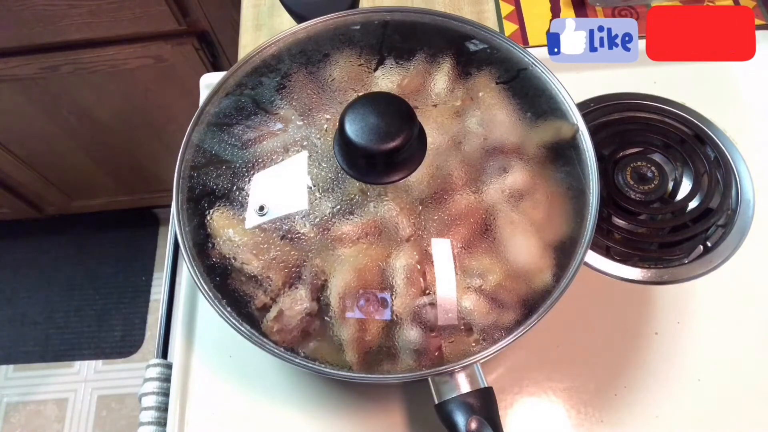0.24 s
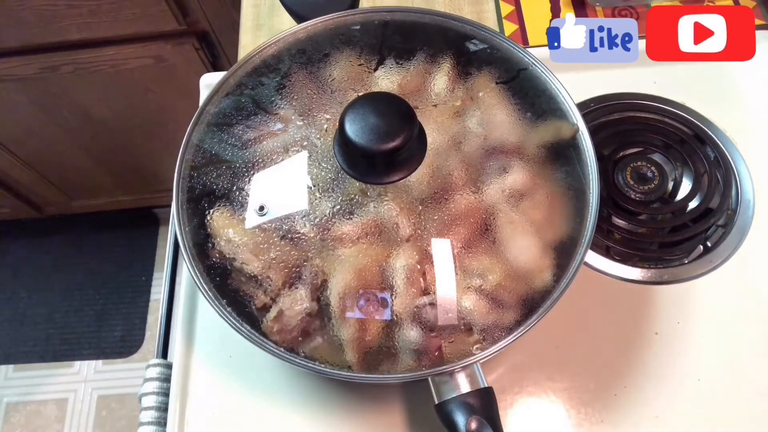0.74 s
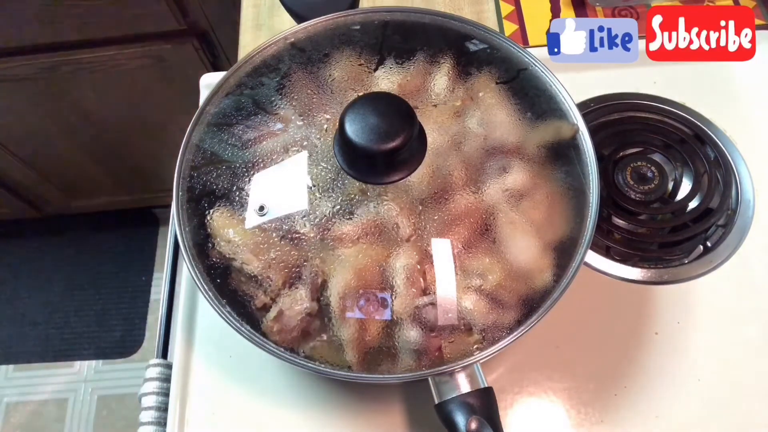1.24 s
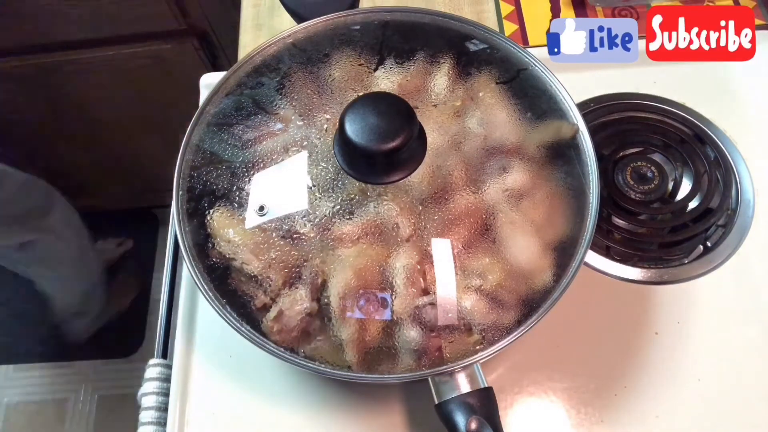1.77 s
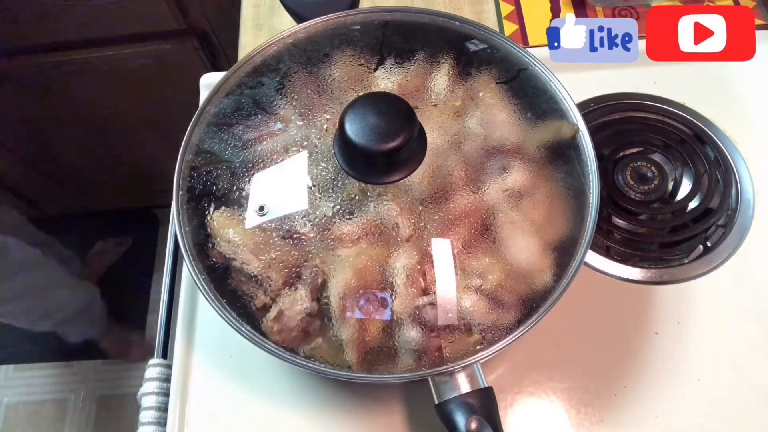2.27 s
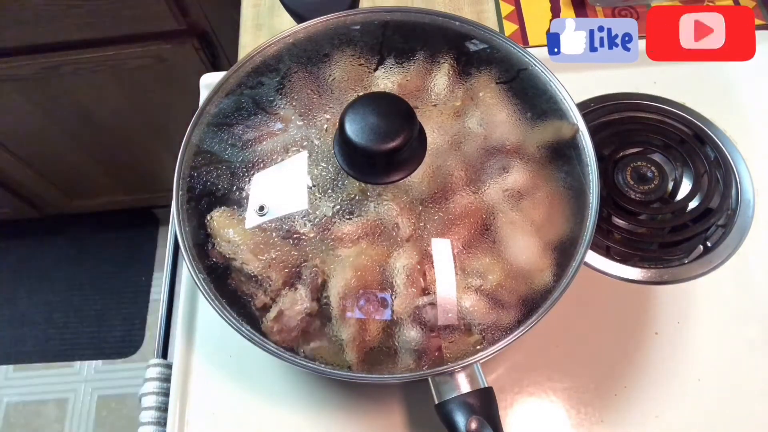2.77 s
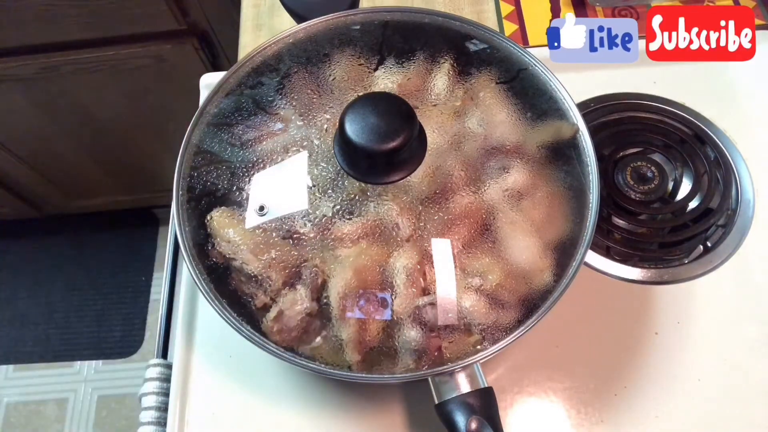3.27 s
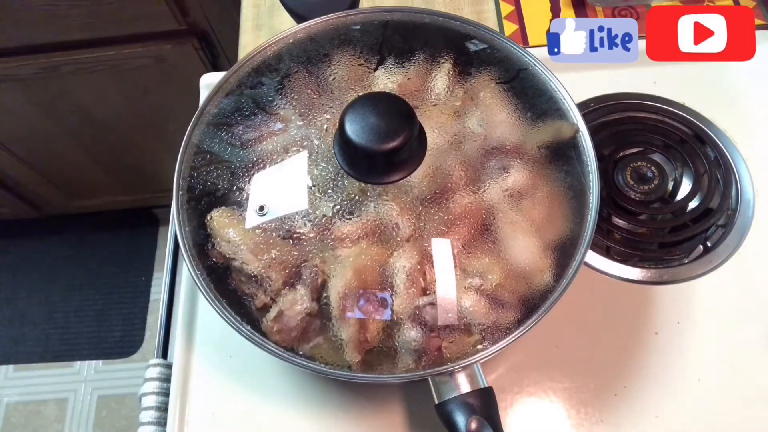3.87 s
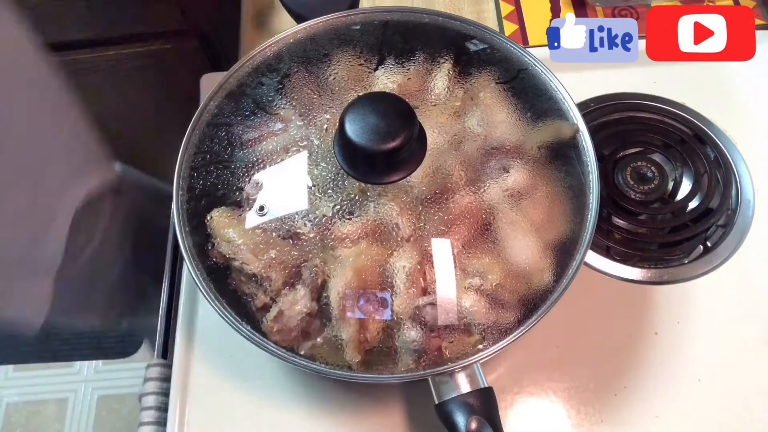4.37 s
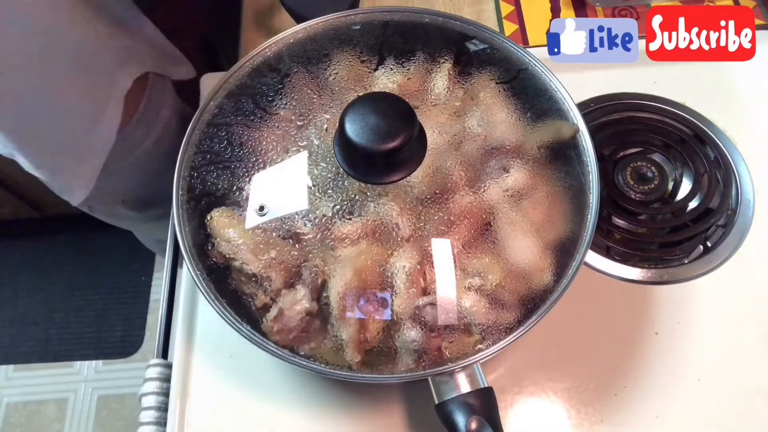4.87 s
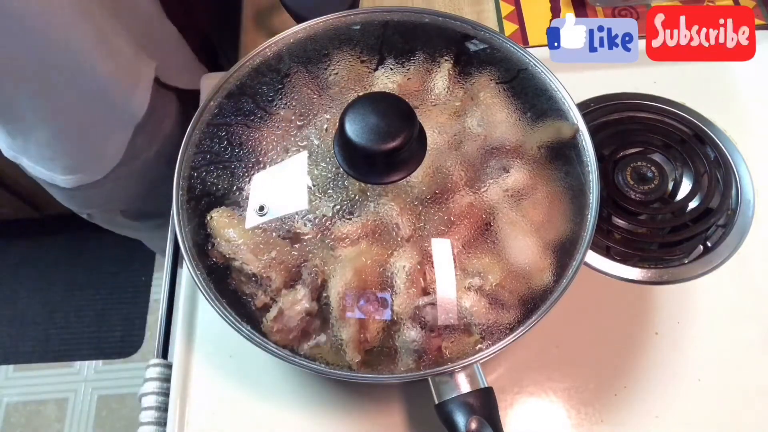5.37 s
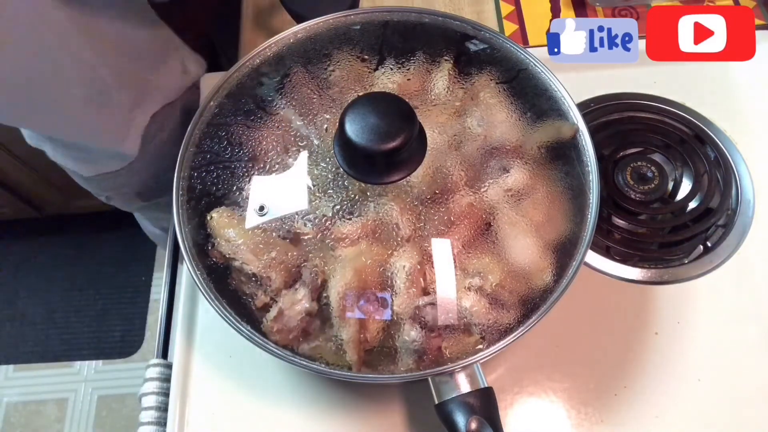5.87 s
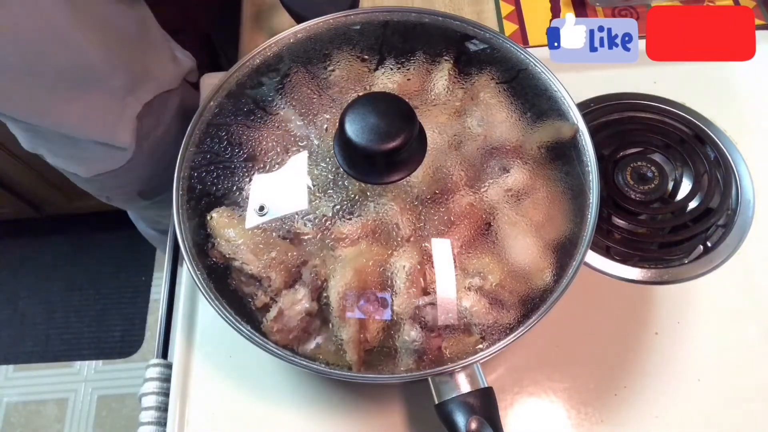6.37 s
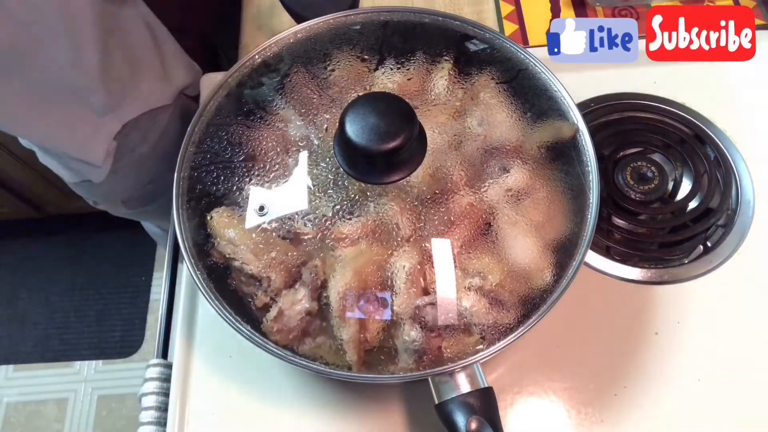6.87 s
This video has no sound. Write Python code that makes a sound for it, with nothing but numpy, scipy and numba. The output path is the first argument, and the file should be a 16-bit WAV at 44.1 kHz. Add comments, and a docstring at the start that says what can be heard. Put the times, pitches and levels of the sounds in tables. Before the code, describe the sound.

Food simmers steadily under a skillet lid with fine crackles and sharp pops, while someone nearby knocks hard objects and briefly scrapes wood.

```python
"""A kitchen: food simmers under the glass lid of a skillet, many small bubbles ringing the air below it.
Dense random clicks, coloured by pan and lid, make the simmer; bright grains and snaps make the crackle.
Someone moving about knocks things (struck resonators), slides them on wood (filtered stick-slip clicks)
and makes small metal parts tinkle. An appliance hums as one wavering low tone."""
import sys
import numpy as np
from scipy import signal
from scipy.fft import rfft, irfft
from scipy.io import wavfile
from scipy.ndimage import uniform_filter1d
from numba import njit

SR = 44100
rng = np.random.default_rng(int(sys.argv[2]) if len(sys.argv) > 2 else 0)


def put_to_file(sound):
    """Save the sound as 16-bit audio at rate SR, in the file named by the first command-line argument."""
    columns = np.atleast_2d(sound).T  # one column per channel
    safe = np.clip(columns, -1, 1)
    whole_steps = np.round(safe * 32767)
    wavfile.write(sys.argv[1], SR, whole_steps.astype(np.int16))


N = 313551  # length in samples


def undb(db):
    """Decibels to an amplitude factor."""
    return 10 ** (np.asarray(db) / 20)


def level(x, db):
    """Scales x, of rms 1 at first or not at all, by its own rms so that rms 1 comes out at 0 dB."""
    return x * undb(db) / np.sqrt(np.mean(x ** 2))


@njit
def svf(x, hz, width):
    """State-variable band-pass with a moving centre, gain 1 there; width is a share of the centre."""
    y = np.empty(len(x))
    band_state, low_state = 0., 0.
    for i in range(len(x)):
        g = np.tan(np.pi * hz[i] / SR)
        v = (band_state + g * (x[i] - low_state)) / (1 + g * (g + width))
        band_state = 2 * v - band_state
        low_state = low_state + 2 * g * v
        y[i] = width * v
    return y


def band(x, hz, width):
    """Band-pass around a fixed or moving centre; width is a share of the centre."""
    centre = np.clip(hz * np.ones(len(x)), 20, SR / 2.3)
    return svf(x, centre, width)


def ring(x, modes):
    """Damped resonators (pitch [Hz], level [dB], t60 [s]) struck by x."""
    out = 0
    for k, (hz, db, t60) in enumerate(modes):
        pole = np.exp(2j * np.pi * hz / SR - np.log(1000) / (t60 * SR))
        tone = signal.lfilter([1], [1, -pole], x).imag
        out = out + (-1) ** k * undb(db) * tone  # neighbours start with opposite sign
    return out


def walk(rate):
    """Random levels held for 1 / rate seconds and slewed twice; spread near 1."""
    k = int(SR / rate)
    steps = np.repeat(rng.standard_normal(N // k + 1), k)
    return 1.27 * uniform_filter1d(uniform_filter1d(steps, k), k)[:N]


def clicks(size, spread_db):
    """Dense one-sample bursts, mostly small and now and then large; rms 1."""
    boost_db = spread_db * np.minimum(rng.exponential(size=size), 5)
    return level(rng.standard_normal(size) * undb(boost_db), 0)


def ticks(per_s, spread_db):
    """Lone sharp ticks at random moments, rms 1."""
    when = rng.random(N) < per_s / SR
    size = rng.standard_normal(N)
    return level(when * np.sign(size) * undb(spread_db * np.abs(size)), 0)


def fade(push, t60, size):
    """Rises within 1 ms, holds for the push [s], then dies away by 60 dB per t60 [s]."""
    t = np.arange(size) / SR
    return np.minimum(t / 0.001, 1) * undb(-60 * np.maximum(t - push, 0) / t60)


def swell(t, s, length, attack, release):
    """Rises, holds and falls away within the length; 0-1."""
    return np.clip(np.minimum((t - s) / attack, (s + length - t) / release), 0, 1)


def add(out, s, x):
    """Mixes x into out from time s [s]."""
    i = int(s * SR)
    out[i:i + len(x)] += x[:len(out) - i]


def simmer():
    """Bubbles too dense to tell apart: pan and lid colour them and each band flickers a little."""
    # colour of the simmer: (frequency [Hz], relative level [dB])
    colour = [(13, -72), (22, -42), (48, -49), (111, -15.5), (168, -17), (254, -13.5), (549, -1.5),
              (784, -8), (1400, -2.5), (1560, -5), (1790, -6), (2490, -4.5), (3370, -19.5), (4200, -13),
              (15700, -38.5)]
    # resonances (+) and notches (-) of pan and lid: (centre [Hz], width [Hz], gain [dB])
    lid = [(128, 13, 9), (323.7, 9, 4.5), (674, 65, 7.5), (776, 310, -4.5), (1428, 110, 4.5),
           (1536, 270, -10), (2470, 140, 3), (2900, 360, 2), (4340, 280, -1), (7040, 83, 14)]
    simmer_db = -49.5
    hz = np.maximum(np.fft.rfftfreq(N, 1 / SR), 1)
    colour_hz, colour_db = np.array(colour).T
    db = np.interp(np.log(hz), np.log(colour_hz), colour_db)
    db = db + sum(gain_db / (1 + (2 * (hz - f) / w) ** 2) for f, w, gain_db in lid)
    bubbles = rfft(clicks(N, 3.64)) * undb(db)
    drift = walk(1.55)  # slow, common to all bands
    place = 3 * np.log2(hz / 20)  # in third-octaves above 20 Hz
    out = 0
    for k in range(0, 32, 2):
        overlap = np.maximum(1 - np.abs(place - k) / 2, 0)  # neighbouring bands crossfade
        part = irfft(bubbles * overlap, N)
        out = out + part * undb(0.091 * drift + 1.65 * walk(14))
    return level(out, simmer_db)


def crackle():
    """A fine bed sputters and surges; bursts open with a snap and thin out as spray."""
    out = fizz()
    add_bursts(out)
    return out


def fizz():
    """Fine grains in bands that sputter together and alone, surging and falling back to a faint bed."""
    # surges: (start [s], length [s], level [dB], tilt before drift [dB per octave])
    surges = [(0.52, 0.1, -51, -5), (0.61, 0.18, -49.5, -3), (0.79, 0.066, -45.5, 0), (1.53, 0.27, -47, -2),
              (1.788, 0.16, -48.5, 4), (1.938, 0.26, -43.5, 0), (2.195, 0.045, -51, 0),
              (2.255, 0.13, -46.5, -2.5), (2.399, 0.12, -46.5, -2), (2.52, 0.23, -51.5, -1),
              (2.742, 0.11, -57, -8), (2.945, .12, -54, -17), (3.122, 0.16, -52.5, -8),
              (3.388, 0.068, -35, -2), (3.582, 0.065, -47, -3), (3.7, 0.21, -52, -1),
              (3.936, 0.11, -46, -2), (4.1, 0.098, -51, -2), (4.188, 0.2, -44.5, -3.5),
              (4.385, 0.16, -54, 0), (4.546, 0.13, -48.5, -7), (4.635, .16, -48.5, -5), (4.83, .04, -52, 0),
              (4.89, 0.079, -54, -6), (5.547, .11, -51.5, -4), (6.466, 0.19, -65, -5),
              (6.64, 0.18, -57.5, -4), (6.912, 0.1, -50, -12)]
    # colour of the fizz before tilt and flicker: (centre [Hz], level [dB])
    fizz_bands = [(4500, -3), (6500, -2.5), (9000, 4), (12000, 3.5), (14800, 3.5)]
    attack_s, release_s = 0.033, 0.055
    bed_db, bed_tilt_db, tilt_drift_db = -59, -2.5, 2  # level [dB]; tilt and its drift [dB per octave]
    t = np.arange(N) / SR
    grains = clicks(N, 3.5) * undb(2.2 * walk(150))
    gains = np.array([undb(db) * swell(t, s, length, attack_s, release_s) for s, length, db, _ in surges])
    gain = undb(bed_db) + gains.sum(axis=0)
    # the loudest part of the mix sets the colour
    surge_tilts = np.array(surges)[:, -1]
    tilt = (bed_tilt_db * undb(bed_db) + surge_tilts @ gains) / gain
    tilt = tilt + tilt_drift_db * walk(10)
    bed = 0
    for hz, band_db in fizz_bands:
        flicker_db = 1.3 * walk(60)
        # every band also has ticks of its own, so the flecks differ in colour
        flecks = grains + undb(-4.5) * ticks(110, 4.0)
        own_db = band_db + tilt * np.log2(hz / 8000) + flicker_db
        bed = bed + undb(own_db) * level(band(band(flecks, hz, 1.0), hz, 1.0), 0)
    return level(bed, 0) * gain


def add_bursts(out):
    """Each burst is a very short noise snap with a longer, fading spray of grains in the same band."""
    # crackle bursts: (time [s], snap peak [dB], centre [Hz], spray rms before its fade [dB])
    bursts = [(0.535, -50, 8290, -44), (0.637, -40, 8300, -47), (0.842, -37, 9400, -40),
              (0.8669, -13.5, 5140, -28.5), (1.4608, -22, 10600, -30.5), (1.536, -35, 7440, -44.5),
              (1.5858, -40, 9000, -50), (1.624, -34, 9000, -45), (1.6853, -31, 9400, -48),
              (1.7759, -38, 13900, -39), (1.8173, -43, 10600, -55), (1.9485, -42, 12000, -44),
              (2.0156, -34, 5750, -41), (2.0643, -27, 12600, -33.5), (2.14, -26.5, 9980, -38.5),
              (2.2273, -39, 7900, -45.5), (2.4248, -29, 13600, -46), (2.471, -28, 13600, -42),
              (2.5065, -36, 12300, -50), (2.5267, -32, 11700, -44), (2.5623, -28, 8500, -42),
              (2.5705, -24, 8620, -34), (2.608, -24, 13600, -54), (2.6424, -43, 10300, -44),
              (2.6723, -34, 7440, -43), (2.7477, -40, 8040, -41), (2.7723, -29, 13700, -45),
              (2.81, -34, 10900, -48), (3.088, -37, 7260, -46.5), (3.1233, -30, 13200, -45),
              (3.2136, -32, 12600, -45), (3.2824, -38, 4860, -47), (3.3463, -33, 4840, -47),
              (3.389, -17, 5500, -20), (3.6668, -33.5, 5000, -45.5), (3.8876, -37, 12400, -39.5),
              (3.9305, -36, 7380, -50), (3.952, -37, 13300, -45), (3.993, -37, 11300, -46),
              (4.122, -36, 11000, -49), (4.1704, -30, 9800, -40), (4.2207, -25, 11400, -34),
              (4.2862, -29, 7200, -40), (4.361, -33, 14000, -41.5), (4.4149, -40, 12500, -42.5),
              (4.5873, -32, 12400, -46), (4.689, -26, 8600, -40), (4.777, -31, 11800, -40),
              (4.8349, -43, 8250, -48), (4.9506, -34, 5700, -48), (4.9952, -24.5, 6100, -43),
              (5.0795, -17.5, 6700, -32), (5.1687, -36, 5970, -52), (5.3746, -37, 6100, -44),
              (5.5048, -9.5, 8800, -26), (5.5862, -42, 6180, -49), (5.9937, -42, 5200, -44),
              (6.021, -40, 9230, -45), (6.356, -43, 7560, -52), (6.501, -43, 8200, -47.5),
              (6.8019, -37, 8050, -58), (6.8495, -35, 9370, -48), (6.9167, -35, 7840, -47.5),
              (6.963, -30, 5450, -42.5)]
    spray_t60_s = 0.094
    size = SR // 4
    for s, snap_db, hz, spray_db in bursts:
        snap = band(rng.standard_normal(size), hz, 1.2) * fade(0.0005, 0.01, size)
        spray = level(band(band(clicks(size, 2.8), hz, 0.97), hz, 5.2), spray_db)
        spray = spray * fade(0.0013, spray_t60_s, size)
        add(out, s, undb(snap_db) * snap / np.abs(snap).max() + spray)


def knocks():
    """A rough push rings the modes around one pitch; a noisy rattle and a low thud go with it."""
    # knocks: (time [s], ring peak [dB], thud peak [dB],
    #          rattle rms before its fade, relative to the ring peak [dB], favoured pitch [Hz])
    blows = [(0.312, -38, -58, -9.5, 1390), (0.455, -31.5, -64, -20, 1530), (0.525, -37.5, -48, -12, 1410),
             (0.831, -31, -68, -19, 1330), (0.866, -13.5, -60, -12, 950), (0.869, -18, -66, -12, 3320),
             (0.876, -15.5, -37, -14.5, 1320), (0.893, -20, -40, -18, 1220), (1.462, -28, -33, -11.5, 1370),
             (2.469, -38.5, -66, -25, 1260), (2.907, -43, -41, -11, 600), (3.088, -41, -55, -19, 3300),
             (3.126, -33, -44, -5.5, 2930), (3.136, -33, -58, -10, 1530), (3.155, -28, -66, -11, 1890),
             (3.187, -39, -71, -27, 3330), (3.211, -41, -66, -23, 1310), (3.254, -33.5, -71, -10, 1320),
             (3.283, -21.5, -66, -17, 1700), (3.284, -27.5, -68, -22, 3520), (3.313, -32.5, -46, -5, 940),
             (3.344, -23.5, -61, -9, 1370), (3.347, -42, -66, -18, 3500), (3.373, -25, -68, -8, 1620),
             (3.386, -19, -31, -2.5, 2040), (3.389, -24, -42, -8, 2900), (3.398, -23, -49, -20, 1410),
             (3.411, -23, -48, -2.5, 1400), (4.481, -40.5, -60, -20, 635), (4.54, -43, -46, -4, 1370),
             (5.082, -32.5, -41, -4, 2680), (5.188, -41.5, -61, -10, 1380),
             (5.507, -19.5, -43.5, -8.5, 4370), (5.586, -36, -64, -24, 3520),
             (5.994, -40, -38.5, -0.5, 1130), (6.355, -42, -46, -9, 2060), (6.946, -37, -38.5, 0, 745),
             (6.965, -31.5, -42, -7.5, 1280), (6.983, -39, -37.5, -7, 700)]
    # what the knocked cupboard and crockery ring with, before scatter: (pitch [Hz], relative level [dB])
    body_modes = [(620, -20), (720, -2.5), (870, -2.5), (993, 3), (1120, 4), (1290, 7.5), (1430, 6),
                  (1600, 1.5), (1800, -14), (1940, 1), (2100, -2.5), (2370, -10.5), (2530, 11.5),
                  (2620, -1), (2860, 9.5), (3280, -22), (3500, 5), (3700, -16), (3960, -10), (4150, 0.5),
                  (4330, -11), (4850, -23), (5360, -16)]
    # low modes of the thud: (pitch [Hz], relative level [dB], t60 [s])
    thud_modes = [(122, -36, 0.12), (182, -7.5, 0.16), (301, -1.5, 0.13), (462, 4, 0.064)]
    push_s, rattle_t60_s = 0.0017, 0.13
    ring_t60_s, ring_slope = 0.1, -0.65  # at 1 kHz; brighter knocks ring shorter, as pitch to this power
    out, size = np.zeros(N), SR // 3
    mode_hz = np.array(body_modes)[:, 0]
    for s, db, thud_db, rattle_db, hz in blows:
        blow = clicks(size, 1.2) * fade(push_s, 0.01, size)
        # each blow lands elsewhere, so the modes shift a little and ring unevenly
        shift, luck = rng.standard_normal((2, len(body_modes)))
        near_db = -18 * np.abs(np.log2(mode_hz / hz)) + 3.9 * luck  # weaker away from the favoured pitch
        t60 = ring_t60_s * (hz / 1000) ** ring_slope
        modes = [(f * (1 + 0.0028 * q), g + d, t60) for (f, g), q, d in zip(body_modes, shift, near_db)]
        body = ring(blow, modes)
        rattle = level(band(band(clicks(size, 5.1), hz, 1.7), hz, 3.9), rattle_db)
        rattle = rattle * fade(push_s, rattle_t60_s, size)
        thud = band(ring(blow, thud_modes), 380, 1.4)
        bright = undb(db) * (body / np.abs(body).max() + rattle)
        add(out, s, bright + undb(thud_db) * thud / np.abs(thud).max())
    return out


def slide():
    """Stick-slip clicks drone in a hollow wooden body and scrape in its thin panels."""
    # strokes on wood: (start [s], length [s], drone before its sag [dB],
    #                   first note [Hz], last note [Hz], scrape [dB])
    strokes = [(0.693, 0.076, -58, 300, 260, -55), (0.764, 0.1, -55.5, 197, 198, -53),
               (2.92, 0.22, -44.5, 305, 330, -47.5), (3.62, 0.26, -53.5, 324, 350, -55),
               (4.463, 0.17, -53, 285, 340, -55)]
    # panel resonances: (centre [Hz], width of the narrower filter [Hz], relative level [dB])
    panels = [(920, 230, 4), (1430, 470, 8), (2470, 420, 6), (3270, 160, 0.5), (4850, 490, -3.5)]
    attack_s, release_s, sag_db = 0.027, 0.029, -7.5  # the drone sags over the stroke
    t, out = np.arange(N) / SR, 0
    rub = clicks(N, 4.3) * undb(0.99 * walk(34))
    scrape = sum(undb(db) * band(band(rub, hz, w / hz), hz, 2 * w / hz) for hz, w, db in panels)
    scrape = level(scrape, 0)
    for s, length, db, first_hz, last_hz, scrape_db in strokes:
        along = np.clip((t - s) / length, 0, 1)
        touch = swell(t, s, length, attack_s, release_s)
        note = first_hz + (last_hz - first_hz) * along
        drone = level(band(band(rub, note, 0.24), note, 0.44), db) * undb(sag_db * along)
        out = out + touch * (drone + scrape * undb(scrape_db))
    return out


def tinkles():
    """Light taps set small metal parts ringing."""
    # taps: (time [s], peak [dB])
    taps = [(2.9711, -49), (3.0874, -40), (3.1233, -31)]
    # modes of the metal: (pitch [Hz], relative level [dB], t60 [s])
    metal_modes = [(3670, -8, .25), (3990, -5, .25), (12070, -25, 0.24), (12700, -24, 0.11),
                   (12600, -1, 0.14), (15600, -7, 0.11)]
    out, size = np.zeros(N), SR // 3
    for s, db in taps:
        tap = clicks(size, 2.0) * fade(0.0022, 0.023, size)
        tone = ring(tap, metal_modes)
        add(out, s, undb(db) * tone / np.abs(tone).max())
    return out


def hum():
    """The appliance: a steady low sine whose level wavers slightly."""
    # hum tone: (pitch [Hz], rms level before the waver [dB])
    tones = [(177.6, -70)]
    t = np.arange(N) / SR
    waver_db = 1.1 * walk(6)
    return sum(undb(db + waver_db) * np.sqrt(2) * np.sin(2 * np.pi * hz * t) for hz, db in tones)


def scene():
    """Simmer and crackle in front, handling around them, hum behind."""
    handling = knocks() + slide() + tinkles()
    # small objects radiate no deep bass
    no_bass = signal.butter(4, 135, "high", fs=SR, output="sos")
    handling = signal.sosfilt(no_bass, handling)
    return (simmer() + crackle() + handling + hum())[None]


def record(dry):
    """The recorder cuts the top: a steep low-pass."""
    top_hz = 15750
    low_pass = signal.ellip(12, 0.2, 70, top_hz, fs=SR, output="sos")
    return signal.sosfilt(low_pass, dry)


dry = scene()
out = record(dry)
put_to_file(out)
```